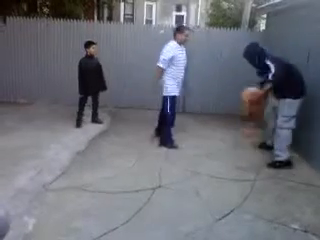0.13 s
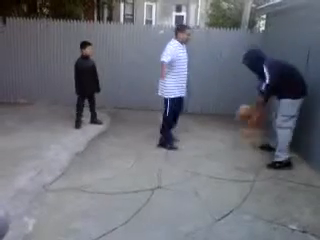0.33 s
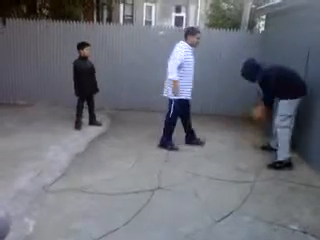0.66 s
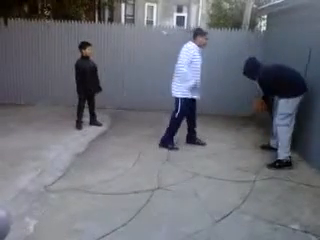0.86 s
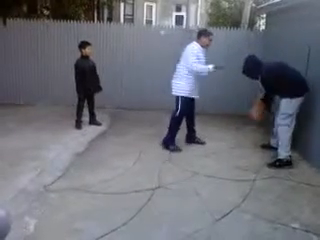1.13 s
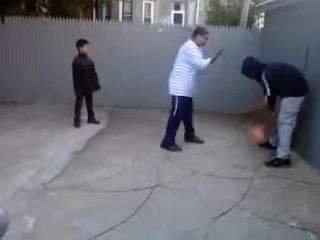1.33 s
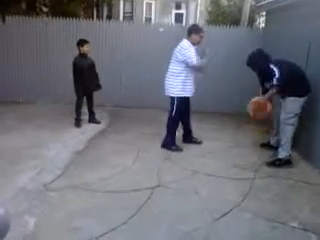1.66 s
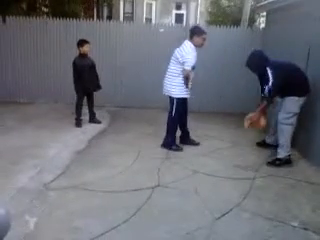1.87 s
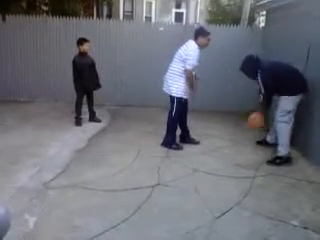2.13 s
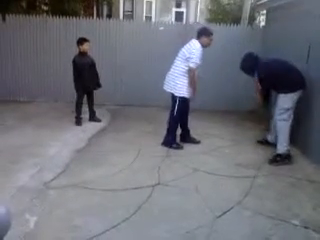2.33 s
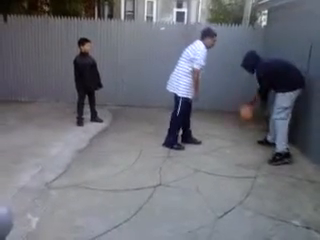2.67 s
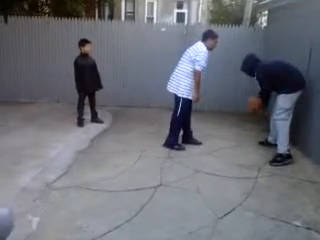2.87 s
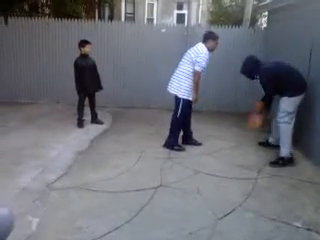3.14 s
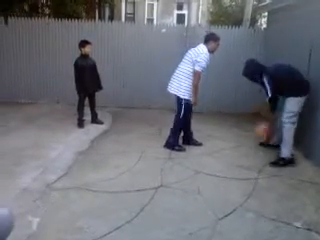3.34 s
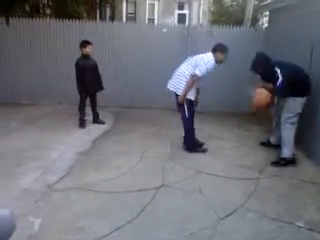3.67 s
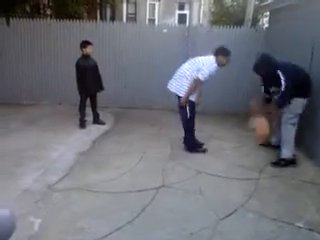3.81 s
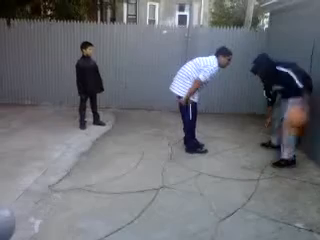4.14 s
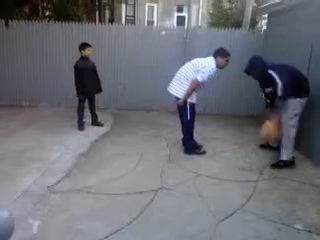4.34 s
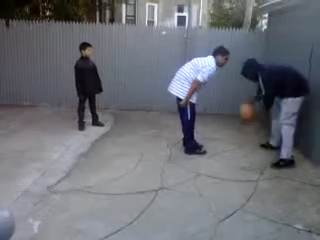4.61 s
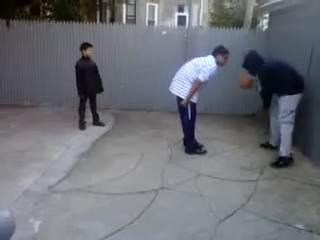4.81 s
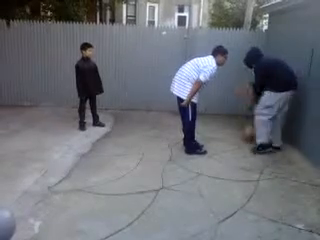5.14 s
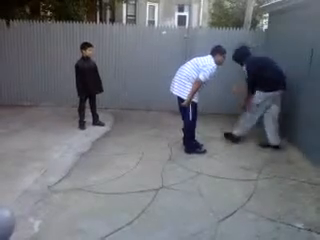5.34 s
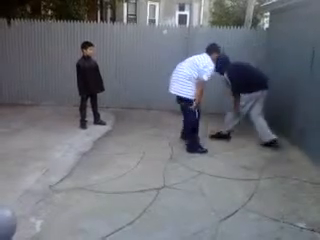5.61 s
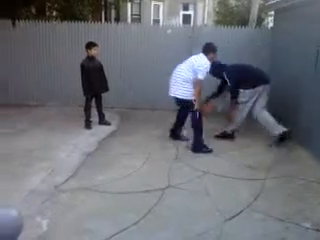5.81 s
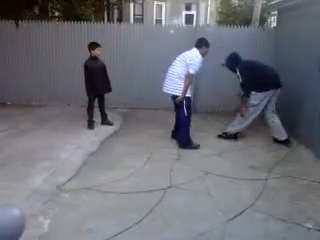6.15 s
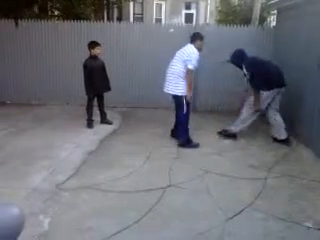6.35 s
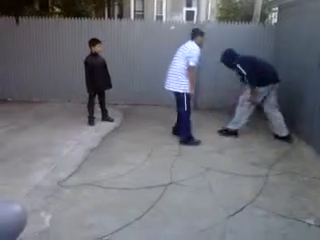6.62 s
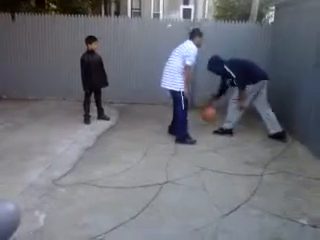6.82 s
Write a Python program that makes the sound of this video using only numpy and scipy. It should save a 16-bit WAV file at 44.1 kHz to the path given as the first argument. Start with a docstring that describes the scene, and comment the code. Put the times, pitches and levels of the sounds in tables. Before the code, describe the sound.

In a concrete yard corner enclosed by ribbed fences, a basketball is dribbled a few metres from one narrow-band mono microphone. The tail of a bounce opens the scene; further hits land near 0.8, 1.5, 2.3, 3.0, 3.5, 4.2, 4.7 and 5.4 seconds, then a tight, heavy double contact at about 5.95 and a brighter bounce at 6.45. Each is a short low thump plus a gritty mid-pitched slap and slight hollow ring, varying in tone, with immediate wall slapback, fence scatter and a third-of-a-second wash from houses. Very quiet distant traffic continues throughout. Low breeze puffs brush the microphone around 0.3, 1.4 and 1.7, strongest near 2.1 seconds. Faint shoe scuffs occur near 0.1, 2.0, 3.9 and 5.8, with the clearest at 6.3. A thin hiss wavers, rising after 5 seconds and remaining until the end.

```python
"""A basketball already mid-bounce is dribbled on concrete in a fenced yard corner, metres from the microphone.
Each bounce is a low thump (damped modes of the squashing ball) and a slap of the skin (dispersed click and grit
noise over a ring of air), thrown back by the wall and the ribbed fences, then by the houses.
A steady town murmur lies behind; light breeze nudges the microphone as shaped low noise; shoes scuff as bursts of
grains between bounces; a thin hiss, filtered noise, comes up near the end."""
import sys
import numpy as np
from scipy import signal
from scipy.fft import rfft, irfft, next_fast_len
from scipy.io import wavfile

SR = 44100
rng = np.random.default_rng(int(sys.argv[2]) if len(sys.argv) > 2 else 0)


def file_out(sig):
    """Save sig as 16-bit WAV at sys.argv[1]."""
    # one column per channel
    cols = np.atleast_2d(sig).T
    # limit, then scale
    lim = np.clip(cols, -1, 1)
    pcm = np.round(lim * 32767).astype(np.int16)
    wavfile.write(sys.argv[1], SR, pcm)


N = 307805
AGE = np.arange(int(SR * .5)) / SR   # time since a contact, s


def from_db(db):
    """Decibels to amplitude gain."""
    return 10 ** (np.asarray(db) / 20)


def size_of(x):
    """Strength of a transient: its rms if all its energy fell within ten milliseconds."""
    return np.sqrt(np.sum(x ** 2) / (SR * .01))


def unit_hit(x):
    """Scale a transient to strength 1."""
    return x / (size_of(x) + 1e-20)


def colour(x, points, tilt_db=0):
    """Causal minimum-phase filter through (Hz, dB) points, tilted in dB per octave within an octave of 1.5 kHz."""
    size = 2 * next_fast_len(len(x))
    octave = np.log2(np.maximum(np.fft.rfftfreq(size, 1 / SR), 10))
    hz, db = np.transpose(points)
    curve_db = np.interp(octave, np.log2(hz), db)
    tilt_curve_db = tilt_db * np.clip(octave - np.log2(1500), -1, 1)
    # folding the cepstrum onto positive times makes the filter minimum-phase
    cepstrum = irfft(np.log(from_db(curve_db + tilt_curve_db)))[:size // 2]
    cepstrum[1:] *= 2
    response = np.exp(rfft(cepstrum, size))
    return irfft(rfft(x, size) * response)[:len(x)]


def crest(x, hz, width_octaves, lift_db):
    """Lift one broad resonance out of a sound."""
    return colour(x, [(hz / 2 ** width_octaves, 0), (hz, lift_db), (hz * 2 ** width_octaves, 0)])


def noise(spectrum):
    """Steady coloured noise, rms 1."""
    x = colour(rng.standard_normal(N), spectrum)
    return x / np.sqrt(np.mean(x ** 2) + 1e-20)


def add(out, sound, s):
    """Mix a sound in at time s, trimmed to the scene."""
    at = round(s * SR)
    lo, hi = max(at, 0), min(at + len(sound), N)
    out[lo:hi] += sound[lo - at:hi - at]


def ring(hz, t60):
    """A struck mode: a sine that falls 60 dB in t60 seconds."""
    return np.sin(2 * np.pi * hz * AGE) * from_db(-60 * AGE / t60)


def thump(hz, t60, shell_ratio=1.446, shell_db=-8, shell_t60=0.056, squash_hz=98, squash_db=-7, squash_t60=0.041):
    """The ball squashes and its shell springs back; the air follows the rate of that motion."""
    # how the soft contact rounds the thump: (f/Hz, gain/dB)
    contact_rounding = [(40, -8.5), (90, 5.5), (180, -2), (300, 2), (400, -3), (550, -12), (800, -30),
                        (2000, -47)]
    modes = [(hz, 0, t60), (hz * shell_ratio, shell_db, shell_t60), (squash_hz, squash_db, squash_t60)]
    motion = sum(from_db(db) * ring(f, decay) / f for f, db, decay in modes)
    velocity = np.diff(motion, prepend=0)
    return unit_hit(colour(velocity, contact_rounding))


def patter(spread_hz, count):
    """The skin lands patch by patch: a click whose pitches arrive milliseconds apart, all equally strong."""
    # a chain of all-pass sections, each holding back one pitch
    pole = np.exp(-np.pi * spread_hz / SR)
    pitches_hz = rng.uniform(600, 5000, count)
    turns = -2 * pole * np.cos(2 * np.pi * pitches_hz / SR)
    sections = [[pole ** 2, turn, 1, 1, turn, pole ** 2] for turn in turns]
    click = signal.unit_impulse(len(AGE)) + 1e-18
    return signal.sosfilt(sections, click)


def grit_burst(rise_s, decay_s):
    """Grit ground under the skin: noise that swells and dies with the contact."""
    return rng.standard_normal(len(AGE)) * (1 - np.exp(-AGE / rise_s)) * np.exp(-AGE / decay_s)


def cavity_ring(bright_db):
    """Air inside the ball rings in its modes, their strengths differing every time."""
    # air modes: (f/Hz, relative level/dB, t60/s)
    air_modes = [(890, -3.5, 0.11), (1134, -4, 0.052), (1495, -2, 0.18), (1990, -1.5, 0.1),
                 (1980, 1.5, 0.066), (2160, -12.5, 0.14), (2932, 4.5, 0.043), (3060, -12.5, 0.042)]
    strengths_db = rng.normal(0, 2.3, len(air_modes))
    ping = sum(from_db(db + own) * ring(f, t60) for (f, db, t60), own in zip(air_modes, strengths_db))
    return unit_hit(colour(ping, [(700, 0), (4000, 0)], bright_db))   # flat but for the tilt


def slap(hz, lift_db, bright_db, grit_db=-5, cavity_db=-13):
    """The pebbled skin smacks the concrete, grinds on grit and sets the air inside ringing."""
    # colour of the skin on concrete: (f/Hz, relative level/dB per Hz)
    skin_colour = [(200, -14.5), (480, -3), (680, -11.5), (950, -4), (1500, 0), (1900, -1.5), (2600, -8.5),
                   (3100, -6.5), (3800, -12), (4200, -22), (5500, -32.5), (7400, -49.5)]
    grit = unit_hit(grit_burst(rise_s=0.0015, decay_s=0.0017))
    contact = unit_hit(patter(spread_hz=516, count=14)) + from_db(grit_db) * grit
    coloured = colour(contact, skin_colour, bright_db)
    smack = unit_hit(crest(coloured, hz, width_octaves=0.31, lift_db=lift_db))
    return smack + from_db(cavity_db) * cavity_ring(bright_db)


def through(x, response):
    """A sound sent along paths with the given impulse response."""
    return signal.fftconvolve(x, response)[:len(x)]


def scattered(x, response):
    """A sound smeared over many paths, keeping its energy."""
    return unit_hit(through(x, response)) * size_of(x)


def many_paths(delay_s, rise_s, t60):
    """Countless weak reflections that build up to a peak at the delay, then die away."""
    early, late = np.minimum(AGE - delay_s, 0), np.maximum(AGE - delay_s, 0)
    envelope = np.exp(-.5 * (early / rise_s) ** 2 - np.log(1000) * late / t60)
    return rng.standard_normal(len(AGE)) * envelope


def hard_echoes(corner_s, corner_db, wander_s):
    """Paths for thump and slap off flat surfaces, shifting as the player moves, and off the corner."""
    # flat surfaces around the ball: (delay/s, relative level of the slap/dB, level of the thump/dB)
    surfaces = [(.0045, -9, -18.5), (0.0107, -13.5, -14), (0.0162, -9.5, -6), (0.0273, -9, -18.5),
                (0.034, -17.5, -15)]
    low_paths, high_paths = np.zeros((2, len(AGE)))
    for delay, high_db, low_db in surfaces:
        at = round(abs(delay + rng.normal(0, wander_s)) * SR)
        low_paths[at], high_paths[at] = from_db(low_db), from_db(high_db)
    high_paths[round(corner_s * SR)] += from_db(corner_db)   # the corner throws the slap straight back
    return low_paths, high_paths


def fence_paths():
    """The ribbed fences scatter the sound along many paths."""
    # near fence, then far one: (delay of the peak/s, relative level/dB, t60/s)
    fences = [(0.0115, -1, 0.12), (.035, 0, 0.031)]
    # the ribs return the middle best and swallow some treble: (f/Hz, relative level/dB)
    rib_colour = [(110, -3), (200, 3.5), (330, 3.5), (600, 2.5), (1500, -1), (2600, 0), (4500, -6.5)]
    paths = sum(from_db(db) * many_paths(delay, rise_s=0.0053, t60=t60) for delay, db, t60 in fences)
    return colour(paths, rib_colour)


def house_paths():
    """The houses answer later, as a diffuse wash."""
    # colour of the wash: (f/Hz, relative level/dB)
    wash_colour = [(60, -8), (130, -3.5), (260, 8), (600, -4.5), (1400, -1.5), (2600, -3.5), (4000, -19.5),
                   (7400, -22.5)]
    return colour(many_paths(delay_s=0.049, rise_s=0.0098, t60=.33), wash_colour)


def yard(low, high, fence_db, corner_s, corner_db=-5, ribs_db=-2, low_ribs_db=-11, wash_db=-8.0,
         low_wash_db=-13, wander_s=0.00027):
    """Direct sound, a few hard echoes, scatter off the fences and a late wash."""
    low_paths, high_paths = hard_echoes(corner_s, corner_db, wander_s)
    ribs, houses = fence_paths(), house_paths()
    low_return = through(low, low_paths) + from_db(low_ribs_db) * scattered(low, ribs)
    high_return = through(high, high_paths) + from_db(ribs_db) * scattered(high, ribs)
    # echoes and scatter of the slap together stand fence_db over the direct slap
    high_return = from_db(fence_db) * size_of(high) * unit_hit(high_return)
    low_wash = from_db(low_wash_db) * scattered(low, houses)
    high_wash = from_db(wash_db + fence_db / 2) * scattered(high, houses)
    return low + high + low_return + high_return + low_wash + high_wash


def dribble():
    """Every bounce is a thump and a slap, heard through the yard."""
    # bounces: (t/s, thump level/dB, thump f/Hz, thump t60/s, slap level/dB before the air's ring, slap f/Hz,
    # lift there/dB, brightness/dB per octave, return over the slap/dB, corner echo delay/s)
    bounces = [(-.04, -32.5, 165, 0.038, -31.5, 1130, 4.5, -2.5, -2, .033),
               (0.7708, -30.5, 155, 0.044, -29.5, 1720, 7, -3, 1, .026),
               (1.517, -30, 163.2, 0.034, -32.5, 1320, 12, -5, 1.5, 0.031),
               (2.2914, -29.5, 179, 0.043, -35, 1080, 5, -5, 2.5, 0.026),
               (3.0008, -29.5, 116, 0.043, -27.5, 1115, 5.5, -1, .5, 0.018),
               (3.4924, -29, 149, 0.039, -37, 1983, 8, -6.5, 4, 0.019),
               (4.1628, -28.5, 133, 0.031, -30.5, 1150, 5, -4, -1.5, 0.026),
               (4.7368, -25.5, 206, 0.041, -30.5, 1401, 3.5, -5, 2.5, .013),
               (5.4195, -28, 113.9, 0.04, -32, 1130, 3.5, -1.5, 6.5, .0242),
               (5.9475, -32, 190, 0.09, -47, 1195, 5, -.5, 14.5, .017),
               (5.9682, -25, 198, 0.05, -31, 1260, 6, -5, -1, .012),
               (6.444, -33, 183, 0.043, -30, 1570, 4.5, 1.5, 2, 0.024)]
    out = np.zeros(N)
    for bounce in bounces:
        s, thump_db, thump_hz, thump_t60 = bounce[:4]
        slap_db, slap_hz, lift_db, bright_db, fence_db, corner_s = bounce[4:]
        low = from_db(thump_db) * thump(thump_hz, thump_t60)
        high = from_db(slap_db) * slap(slap_hz, lift_db, bright_db)
        add(out, yard(low, high, fence_db, corner_s), s)
    return out


def town():
    """The steady murmur of distant traffic, as coloured noise."""
    # colour of the distant town: (f/Hz, relative level/dB per Hz)
    town_colour = [(20, -5.5), (60, 1), (120, 1), (250, 1), (450, -6.5), (800, -6.5), (1450, -5.5),
                   (2200, -5.5), (3200, -10), (3800, -12.5), (4300, -46), (7400, -40.5)]
    return from_db(-63.5) * noise(town_colour)


def thin_hiss(whole_over_treble_db=5.5):
    """Coloured noise whose level wavers, then comes up near the end."""
    # colour of the hiss: (f/Hz, relative level/dB per Hz)
    hiss_colour = [(500, -11.5), (1500, -2), (2500, 1), (3500, 0.5), (4000, -2.5), (4500, 1.5),
                   (5500, -1.5), (6700, -6), (7400, -20)]
    # its level in the treble alone: (t/s, level/dB)
    treble_level = [(0.0, -76.5), (1.16, -80.5), (1.92, -75), (3.46, -82.5), (4.65, -77.5), (5.31, -66),
                    (6.28, -63.5), (6.47, -67.5), (6.98, -67)]
    times, levels_db = np.transpose(treble_level)
    treble_db = np.interp(np.arange(N) / SR, times, levels_db)
    return from_db(treble_db + whole_over_treble_db) * noise(hiss_colour)


def drift(rate_hz):
    """Slow chance: straight lines between random knots of spread 1, two knots per cycle."""
    knots = rng.standard_normal(N // 100)
    return np.interp(np.arange(N) / SR * rate_hz * 2, np.arange(len(knots)), knots)


def breeze(light_air_db=-66, swing_db=2, swing_hz=3.3):
    """Light air keeps stirring at the microphone; each eddy swells and fades on top of it."""
    # colour of the buffeting: (f/Hz, relative level/dB per Hz)
    buffet_colour = [(15, -10), (33, 5), (52, 1.5), (80, 0.5), (140, -8), (230, -11.5), (400, -30.5),
                     (1000, -61.5)]
    # eddies that brush the microphone: (t of the peak/s, level/dB, length/s)
    eddies = [(.09, -51, 0.1), (0.292, -44, 0.058), (0.511, -51.5, .04), (0.622, -58.5, 0.16),
              (1.392, -45.5, 0.023), (1.472, -51, 0.11), (1.675, -48, 0.052), (1.788, -55, .05),
              (1.997, -42, 0.046), (2.09, -39, 0.05), (2.2, -50.5, 0.079), (2.479, -51, 0.045),
              (2.806, -52, .03), (3.768, -54.5, 0.028), (5.689, -54, 0.052)]
    t = np.arange(N) / SR
    power = from_db(light_air_db + swing_db * drift(swing_hz)) ** 2
    for s, db, length_s in eddies:
        power = power + from_db(db) ** 2 * np.exp(-(2 * (t - s) / length_s) ** 2)
    return np.sqrt(power) * noise(buffet_colour)


def shoes(grain_db=4.5):
    """A heel thuds and the sole rolls down over grains of grit, a few of them much louder."""
    # shoes on the slab: (t/s, thud level/dB, scuff level/dB, scuff f/Hz, time constant of the roll/s,
    # brightness/dB per octave)
    steps = [(.132, -62, -51.5, 1630, 0.0015, -2.5), (1.988, -51.5, -52, 1964, 0.0038, 5),
             (3.902, -53, -64.5, 1402, 0.005, -2), (5.767, -55, -50, 1600, 0.0019, -0.5),
             (5.847, -57, -54, 883, 0.0043, -2), (6.339, -59, -41, 1537, 0.0037, -0.5)]
    # colour of a sole on grit: (f/Hz, relative level/dB per Hz)
    sole_colour = [(150, -12), (400, -1.5), (600, -5.5), (950, 0.5), (1900, -3.5), (2600, -9.5),
                   (4000, -12.5), (5000, -23), (7400, -41)]
    out = np.zeros(N)
    for s, thud_db, scuff_db, hz, roll_s, bright_db in steps:
        press = AGE ** 2 * np.exp(-AGE / roll_s)
        grains = rng.standard_normal(len(AGE)) * from_db(grain_db * rng.exponential(1, len(AGE)))
        coloured = colour(grains * press, sole_colour, bright_db)
        scuff = from_db(scuff_db) * unit_hit(crest(coloured, hz, width_octaves=0.4, lift_db=7))
        thud = from_db(thud_db) * thump(hz=144.0, t60=.04)
        add(out, yard(thud, scuff, fence_db=1, corner_s=0.016), s)
    return out


def scene():
    """The yard at one microphone."""
    return (dribble() + town() + thin_hiss() + breeze() + shoes())[None]


def record(dry):
    """A narrow-band recorder cuts the top with a steep elliptic low-pass."""
    cutoff_hz, ripple_db, stop_db = 7400, .2, 80
    return signal.sosfilt(signal.ellip(10, ripple_db, stop_db, cutoff_hz, fs=SR, output="sos"), dry)


dry = scene()
out = record(dry)
file_out(out)
```